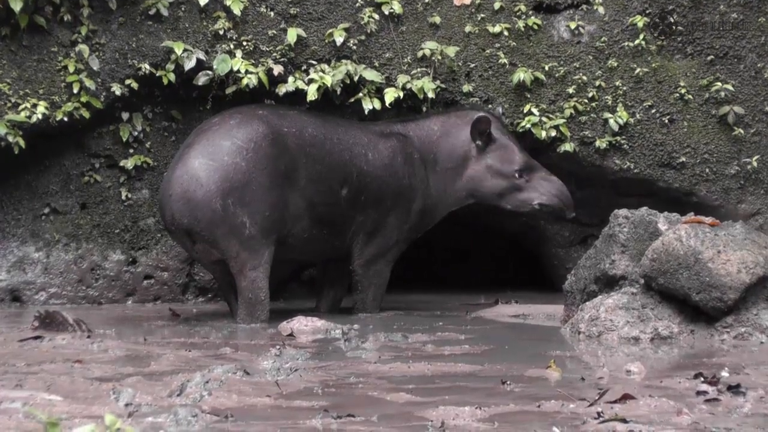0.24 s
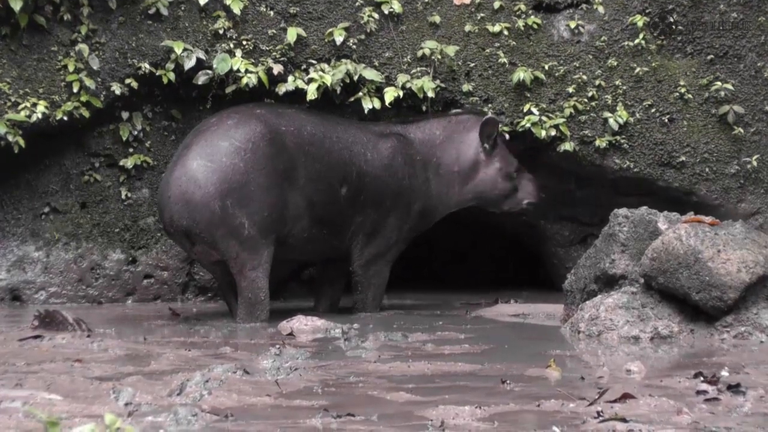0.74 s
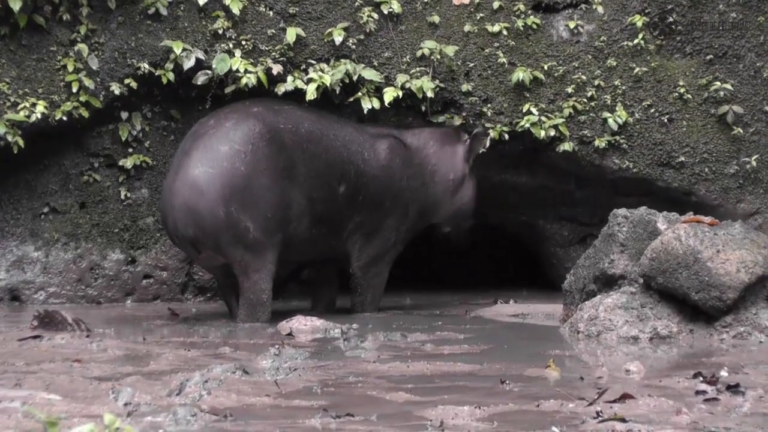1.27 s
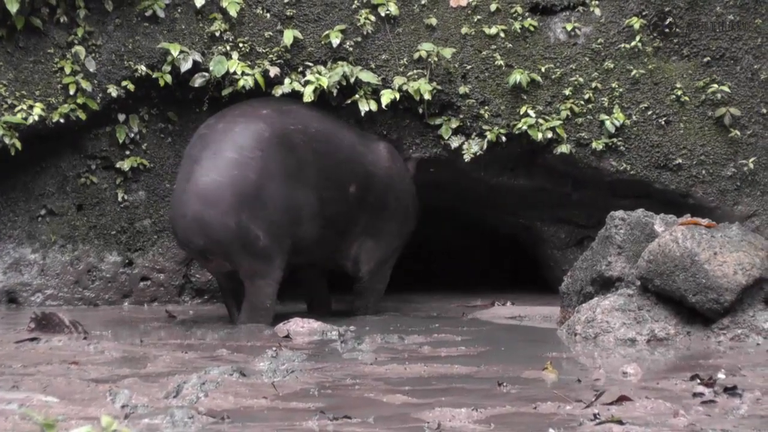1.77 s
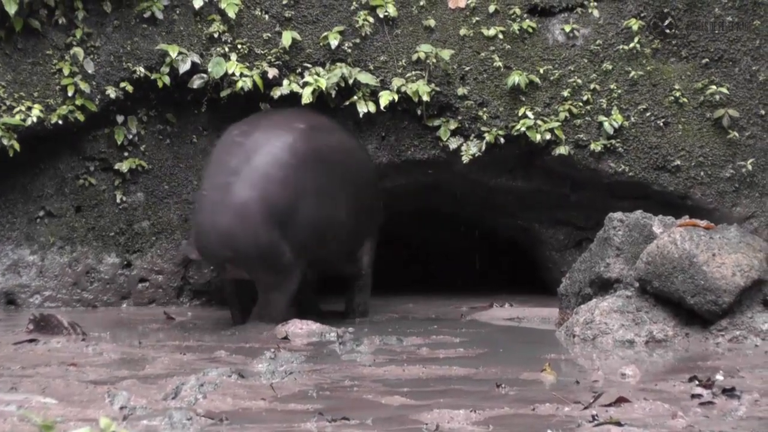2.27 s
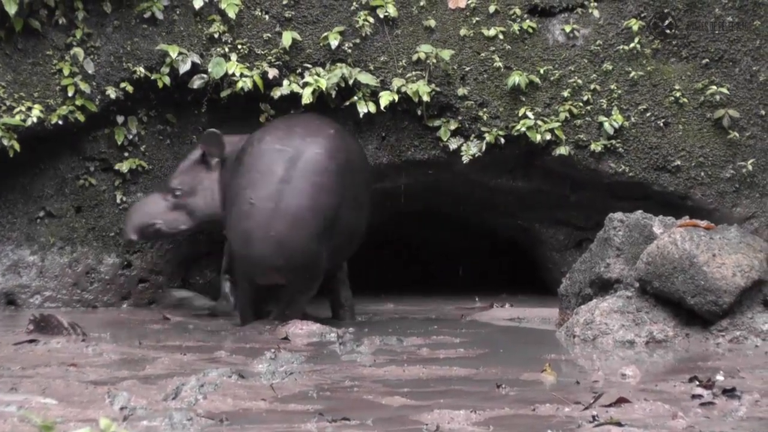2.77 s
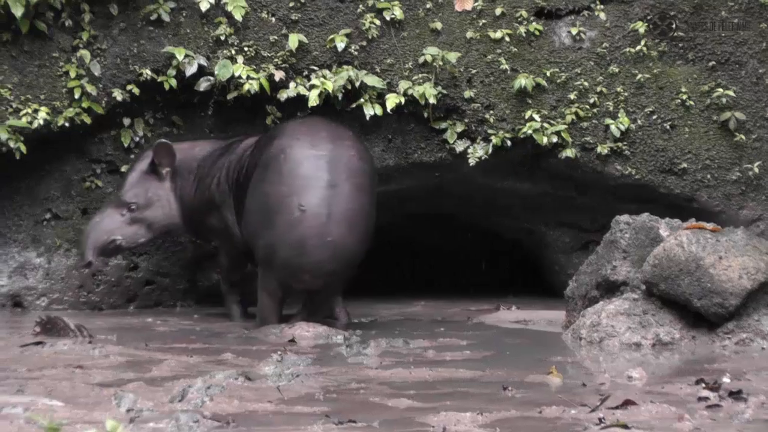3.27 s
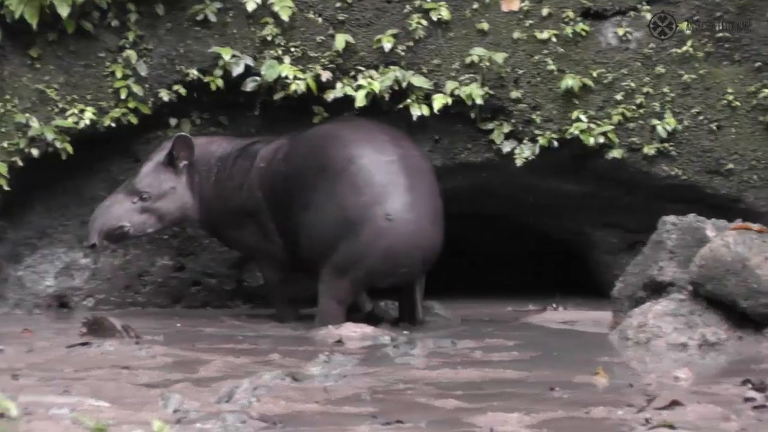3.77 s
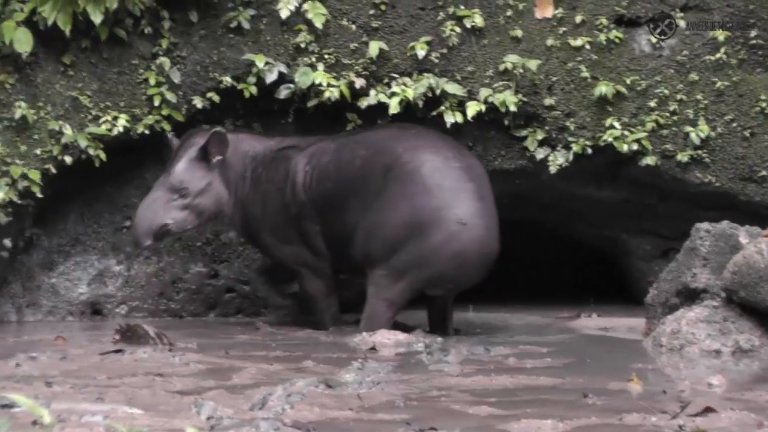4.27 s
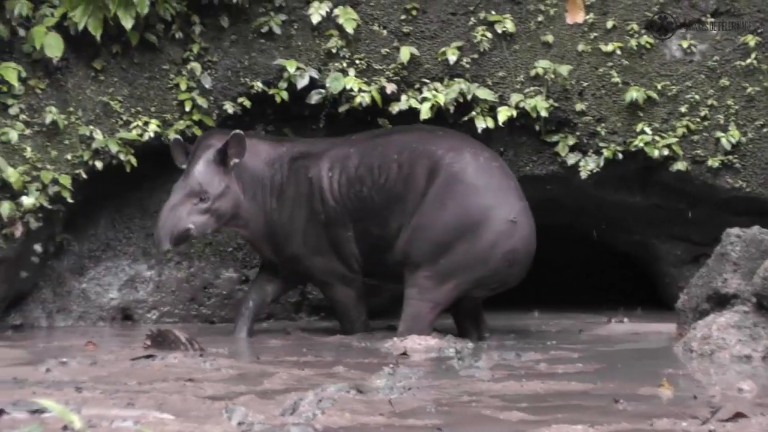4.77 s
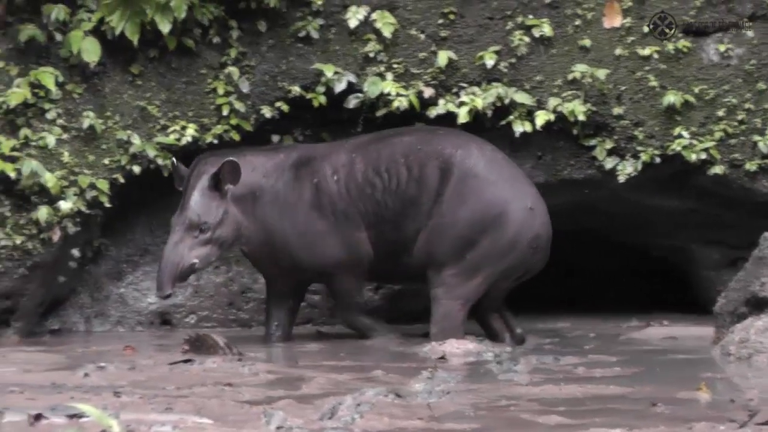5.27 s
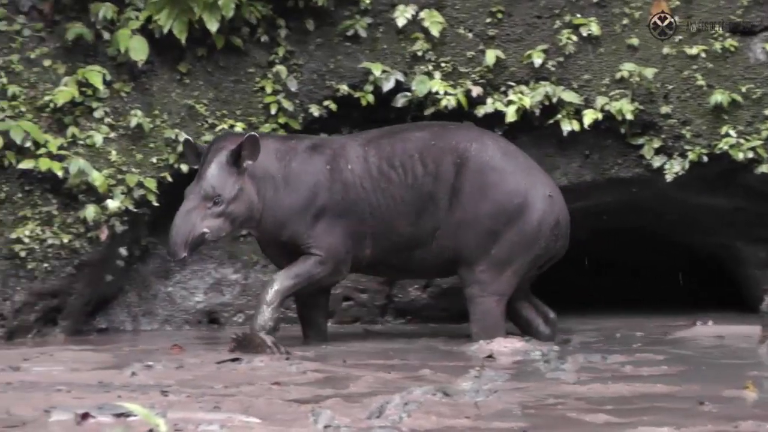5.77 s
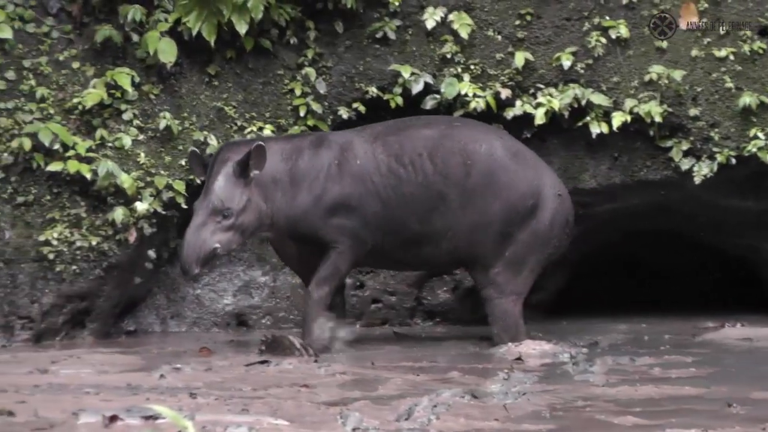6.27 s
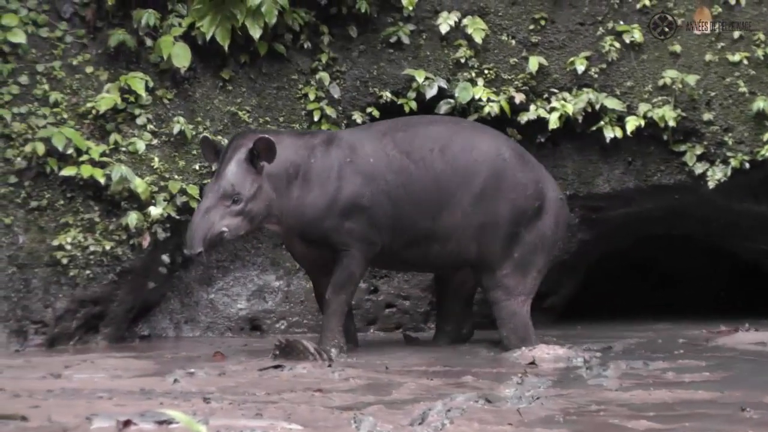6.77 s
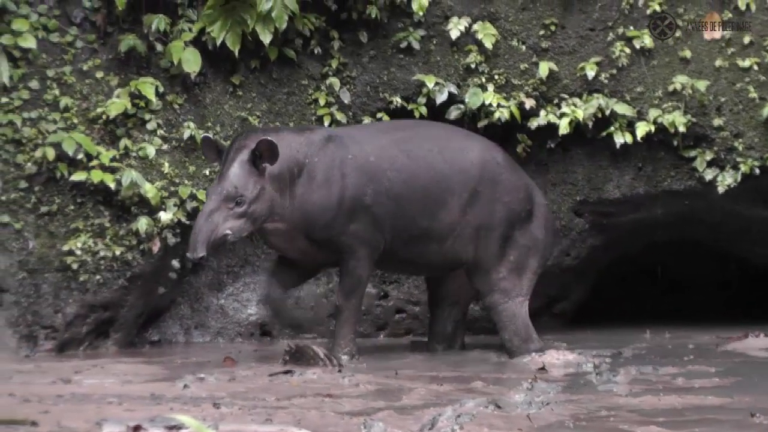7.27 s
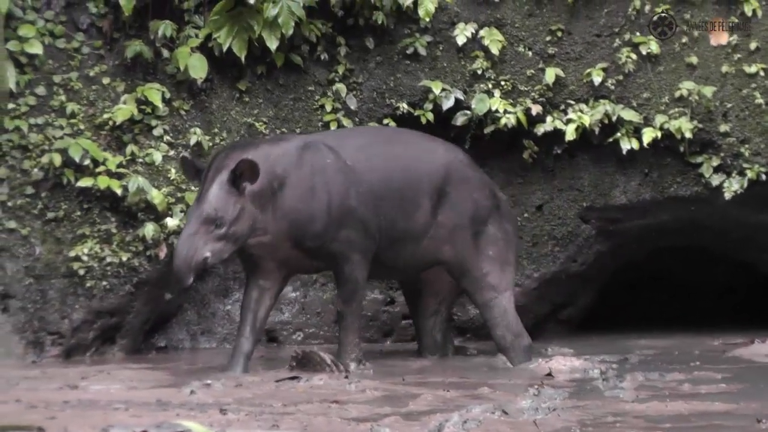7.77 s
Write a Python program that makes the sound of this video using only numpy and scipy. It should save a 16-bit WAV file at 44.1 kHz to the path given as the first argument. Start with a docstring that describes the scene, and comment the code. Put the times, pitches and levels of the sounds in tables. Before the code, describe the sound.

A small frog's rising whistle repeats quickly over a muddy forest pool, a second answering farther off, amid insect hiss and faint wet mud smacks.

```python
"""Two small frogs, one near and one further off, repeat a rising whistle over a muddy pool under a forest bank.
Each whistle is a gliding sine, thrown back by single reflectors and by leaves and trunks. A cicada's ringing
clicks sound overhead, far ones wind up as two hissing bands, a cricket trills in two beating tones.
A large animal wades slowly: noise-and-ring smacks of mud, clusters of gliding bubbles. Air hisses and hums.
A camera with close-set microphones listens; its clock ripples the gain."""
import sys
import numpy as np
from scipy import signal
from scipy.fft import rfft, irfft, next_fast_len
from scipy.io import wavfile
from scipy.ndimage import uniform_filter1d

SR = 44100
rng = np.random.default_rng(int(sys.argv[2]) if len(sys.argv) > 2 else 0)


def ratio(d):
    """dB to gain"""
    e = np.asarray(d, float) / 20
    return 10 ** e


def to_wav(sig):
    """Store sig (one row per channel, or 1-D mono) as 16-bit WAV at the path in sys.argv[1].

    Samples outside -1..1 are clipped; the rate is SR.
    """
    pcm = np.clip(np.atleast_2d(sig), -1, 1) * 32767
    pcm = np.round(pcm).astype(np.int16)
    wavfile.write(sys.argv[1], SR, pcm.T)  # frames by channels


N = 354563
T = np.arange(N) / SR
SIZE = next_fast_len(2 * N)
HZ = np.arange(SIZE // 2 + 1) * SR / SIZE

# Whistles. Each row: time of the reference pitch in seconds, source level in dB, first pitch in Hz,
# steepness of the rise as a factor.
NEAR_CALLS = [(-0.018, -33, 2996, 1.13), (0.2617, -34, 2986, 0.97), (0.5354, -34, 2983, 1.02),
              (0.812, -34.5, 2980, 0.97), (1.105, -33.5, 2970, 1.08), (1.397, -34, 2960, 1.05),
              (1.6879, -34, 2994, 0.97), (1.9775, -34, 2984, 0.99), (2.2752, -34.5, 2986, 0.97),
              (2.5592, -33.5, 2977, 1.04), (2.8446, -34, 2950, 1), (3.1258, -33.5, 2967, 1.07),
              (3.4256, -34.5, 2984, 0.92), (3.7096, -35.5, 2950, 0.92), (4.022, -35.5, 2935, .91),
              (4.3166, -35, 2970, 0.9), (4.6311, -35, 2940, 1.18), (4.9642, -34.5, 2935, 1.03),
              (5.3386, -34.5, 2940, 1.1), (5.716, -32.5, 2950, 1.07), (6.0959, -34, 2930, 1.14)]
FAR_CALLS = [(0.03, -50, 3250, .97), (0.3269, -48, 3310, 0.98), (0.6312, -43, 3260, 1),
             (0.9137, -42, 3310, 0.98), (1.2174, -44.5, 3260, 0.88), (1.5221, -41.5, 3200, 1),
             (1.8112, -43, 3220, .93), (2.1344, -40.5, 3260, .97), (2.3883, -41, 3220, 0.94),
             (2.7458, -41.5, 3260, 0.96), (3.082, -40, 3260, 1), (3.382, -40, 3270, 1),
             (3.6757, -42.5, 3150, 0.94), (3.9765, -42, 3210, 1), (4.272, -40.5, 3240, 0.96),
             (4.5674, -39.5, 3260, 0.99), (4.8553, -40.5, 3284, .97), (5.1593, -40, 3303, 0.98),
             (5.4444, -40.5, 3284, .97), (6.0015, -41.5, 3210, 0.92), (6.2983, -40.5, 3260, 0.99),
             (6.5637, -40.5, 3277, 0.92), (6.8388, -40, 3283, 0.98), (7.1197, -42.5, 3060, 0.95),
             (7.3933, -41, 3230, 0.95), (7.6639, -41, 3240, 0.99), (7.9496, -40.5, 3283, 0.98)]
# Pitch rise of a whistle. Each row: time from the reference pitch in seconds, pitch in Hz.
NEAR_RISE = [(-.055, 2900), (-.02, 3049), (0, 3200), (0.019, 3380), (0.038, 3610), (.055, 3720)]
FAR_RISE = [(-.045, 3040), (-.014, 3270), (0, 3330), (.012, 3390), (.025, 3560), (.045, 4000)]
# Pitch span from first pitch to break-off. Entries: span at 0 s in Hz, drift in Hz per second.
NEAR_REACH_HZ = (718, -17.5)
FAR_REACH_HZ = (590, 6)
# Gain of the direct path. Each row: frequency in Hz, gain in dB.
NEAR_COLOUR = [(2900, -8), (3020, -1.5), (3080, -5.5), (3200, 7.5), (3300, -8.5), (3420, -8), (3560, 4.5),
               (3700, -12.5), (3800, -6)]
FAR_COLOUR = [(3050, 2), (3250, 3.5), (3330, 4.5), (3390, 4), (3480, -0.5), (3560, -2), (3750, -2),
              (3900, -30)]
# Reflectors, each returning a slice of the whistle. Each row: delay in seconds, centre in Hz,
# width in Hz, gain in dB.
NEAR_ECHOES = [(.012, 3204, 170, -1.5), (.006, 3600, 110, -8.5), (0.032, 3200, 25, -3),
               (0.04, 3234, 96, -2), (0.0289, 1700, 70, -19), (0.0315, 2720, 190, -9.5),
               (0.01285, 4000, 110, -19)]
FAR_ECHOES = [(.030, 3420, 70, -9), (.016, 3630, 60, 4), (.030, 3610, 60, 2.5), (.056, 3445, 70, -28),
              (.062, 3730, 90, -0.5), (.1, 3449, 70, -10.5)]
# Cicada loudness. Each row: time in seconds, level in dB before flicker.
CICADA_LEVEL = [(0, -50), (7.1, -50), (7.6, -50.5)]
# Tymbal resonances. Each row: centre in Hz, width in Hz, relative gain in dB.
TYMBAL_MODES = [(8440, 1780, 4), (9060, 760, -0.5), (13000, 1500, -11), (5300, 490, -11)]
# Far cicadas. Each row: time in seconds, low band in dB, high band in dB, both before flicker.
CHOIR_LEVELS = [(0, -66, -59), (.5, -62, -61), (1.1, -60, -60), (2.4, -58.5, -58), (2.8, -61, -51.5),
                (4, -65, -52), (6, -64, -52.5), (8.04, -60.5, -54)]
# Cricket trills. Each row: start in seconds, level in dB before flicker.
TRILLS = [(-.03, -56), (.35, -63), (.72, -70), (1.07, -59), (1.46, -60), (1.84, -60), (2.19, -59),
          (3.57, -56.5), (3.94, -56), (4.42, -65), (4.83, -62), (5.2, -57), (5.9, -56.5), (6.28, -61),
          (6.68, -61), (6.98, -62)]
# Air, leaves and far insects. Each row: frequency in Hz, relative density in dB per Hz.
AIR_SPECTRUM = [(20, -25.5), (40, -23.5), (187, -19.5), (263, -15.5), (674, -8.5), (1370, -12), (2020, -16),
                (2900, -11), (4100, -16.5), (5760, -25), (7100, -11), (9300, -19.5), (10300, -22),
                (13300, -29), (13800, -41), (15600, -24)]
# Width of the air. Each row: frequency in Hz, side over mid in dB.
AIR_SIDE = [(60, -16), (110, -16), (200, -14), (380, -17.5), (700, -20), (1290, -22), (2380, -27),
            (4400, -60), (8120, -28.5), (15000, -10)]
# Faint steady tones. Each row: frequency in Hz, rms level in dB before drift.
HUMS = [(283, -75.5)]
# Mud letting go. Each row: time in seconds, source level in dB, ring in Hz.
SMACKS = [(.237, -36, 1080), (0.642, -32, 1790), (.655, -40, 1510), (1.061, -39, 1090), (5.838, -25, 2350),
          (5.861, -28, 2780), (5.885, -32, 1100), (5.920, -28.5, 2100), (7.589, -30.5, 2540)]
# Water stirred by a leg. Each row: start in seconds, span of bubble onsets in seconds, source level in dB,
# centre pitch in Hz, a third of the pitch span in octaves.
SLOSHES = [(.642, 0.04, -51, 1200, 0.71), (1.651, 0.091, -58, 700, 0.24), (2.846, .2, -54, 703, 0.27),
           (3.23, 0.0514, -63.5, 154, 0.12), (3.7, 0.24, -52, 750, 0.38), (4.15, .04, -56.5, 1450, .1),
           (5.837, .006, -45, 2300, .5), (5.858, 0.04, -34, 4200, 0.54), (5.852, 0.022, -47.5, 732, 0.15),
           (5.875, 0.026, -46, 1110, 0.076), (5.927, 0.0039, -50, 1990, 0.53),
           (5.982, 0.021, -52.5, 910, 0.49), (6.098, .15, -52, 800, 0.28), (6.385, .05, -47.5, 2150, 0.07),
           (6.433, 0.059, -54, 1936, .1), (7.579, 0.17, -52, 740, 0.11)]
# Gain ripple of the camera clock. Each row: harmonic number, depth in dB.
CLOCK_RIPPLE = [(1, -19), (2, -24), (3, -28), (4, -34)]

SWELL_S, EDGE_S = 0.017, 0.014  # whistle swell-in and edge smoothing
CICADA_CLICKS_PER_S, CICADA_SPEEDUP_PER_S2 = 106.43, 0.212
TRILL_S, TRILL_EDGE_S = 0.26, 0.025
AIR_DB = -50  # mid rms
CLOCK_HZ = 3903


def curve(table, column=1, at=T):
    """A table column joined by straight lines."""
    rows = np.array(table, float)
    return np.interp(at, rows[:, 0], rows[:, column])


def octave_gain(table, octave):
    """Gain from (Hz, dB) rows joined by straight lines over octaves."""
    hz, db = np.array(table, float).T
    return ratio(np.interp(octave, np.log2(hz), db))


def shape(x, response):
    """Pass a sound through a frequency response."""
    return irfft(rfft(x, SIZE) * response, SIZE)[..., :N]


def hump(hz, width_hz):
    """A Gaussian band, gain 1 at the centre."""
    return np.exp(-0.5 * ((HZ - hz) / width_hz) ** 2)


def unit(x):
    """Scale to rms 1."""
    return x / np.sqrt(np.mean(x ** 2))


def walk(rate_hz):
    """Random levels held 1 / rate_hz and slewed twice; spread near 1."""
    hold = int(SR / rate_hz)
    steps = np.repeat(rng.standard_normal(N // hold + 1), hold)
    return 1.4 * uniform_filter1d(uniform_filter1d(steps, hold), hold)[:N]


def forest(t60_s, onset_s, side_db):
    """Dense scatter from trunks and leaves: mid response of about unit energy, side at side_db."""
    fade = np.exp(-np.log(1000) * T / t60_s) * (1 - np.exp(-T / onset_s))
    tails = rng.standard_normal((2, N)) * fade / np.sqrt(np.sum(fade ** 2))
    return rfft(tails, SIZE) * np.array([[1], [ratio(side_db)]])


def frog(calls, rise, reach_hz, colour, echoes, near_db, far_db, side_db, pan):
    """Rising sine whistles, heard directly, off single reflectors and through the forest."""
    lead = SR // 10  # room for a whistle that began earlier
    voice = np.zeros(N + 2 * lead)
    span_s = np.arange(-lead // 2, lead) / SR
    centre_hz = curve(rise, at=0)
    for s, db, first_hz, steep in calls:
        hz = centre_hz + steep * (curve(rise, at=span_s) - centre_hz)
        tone = np.sin(2 * np.pi * np.cumsum(hz) / SR)
        last_hz = first_hz + reach_hz[0] + reach_hz[1] * s
        in_pitch = (hz > first_hz) & (hz < last_hz)
        sounding = in_pitch & (span_s > rise[0][0]) & (span_s < rise[-1][0])
        swell = np.minimum(np.cumsum(sounding) / (SWELL_S * SR), 1)
        envelope = uniform_filter1d(swell * sounding, int(EDGE_S * SR))
        at = int(s * SR) + lead // 2
        voice[at:at + len(span_s)] += ratio(db) * envelope * tone
    direct = ratio(curve(colour, at=HZ))
    paths = direct + sum(ratio(db) * hump(hz, width_hz) * np.exp(-2j * np.pi * HZ * delay_s)
                         for delay_s, hz, width_hz, db in echoes)
    undergrowth = ratio(near_db) * forest(0.43, 0.0021, side_db)  # at once and brief
    trunks = ratio(far_db) * forest(1.8, 0.03, side_db)  # late and long
    response = np.array([paths, pan * paths]) + (undergrowth + trunks) * direct ** 0.12
    return irfft(rfft(voice, SIZE) * response, SIZE)[:, lead:lead + N]


def cicada():
    """Tymbal clicks, a strong and a weak membrane in turn, ring briefly and scatter overhead."""
    phase = 0.25 + np.cumsum(CICADA_CLICKS_PER_S + CICADA_SPEEDUP_PER_S2 * T) / SR
    at = np.flatnonzero(np.diff(np.floor(phase)))
    chance = rng.standard_normal((len(at), 3))
    size = ratio(1.45 * chance[:, 0] + 1.5 * (-1.0) ** np.arange(len(at)))
    clicks, stirred = np.zeros((2, N))
    # jitter in samples: uneven strokes; moving leaves blur the scattered part more
    clicks[at + np.rint(0.4 * chance[:, 1]).astype(int)] = size
    stirred[at + np.rint(0.75 * chance[:, 2]).astype(int)] = size
    ring = sum(ratio(db) / (1 + 2j * (HZ - hz) / width_hz) ** 2 for hz, width_hz, db in TYMBAL_MODES)
    scatter = ratio(0.5) * forest(0.4, 0.006, -15.5)
    direct = shape(clicks, ring * np.array([[1], [0.3j]]))
    heard = direct + shape(stirred, ring * scatter)
    return heard / np.std(heard[0]) * ratio(curve(CICADA_LEVEL) + 0.8 * walk(7))


def choir():
    """Far cicadas blur into two hissing bands."""
    bands = 0
    for column, (hz, width_hz) in enumerate([(5000, 390), (6500, 1060)], 1):
        hiss = unit(shape(rng.standard_normal((2, N)), hump(hz, width_hz)))
        bands = bands + hiss * ratio(curve(CHOIR_LEVELS, column) + 1.15 * walk(8.1))
    return bands * np.array([[1], [ratio(-18.5)]])


def cricket():
    """Trills of two thin neighbouring tones that beat, with a brief smear of distance."""
    tone = sum(np.sin(2 * np.pi * np.cumsum(hz + 16 * walk(20)) / SR) for hz in (6616, 6667))
    trills = 0
    for s, db in TRILLS:
        to_edge_s = np.minimum(T - s, s + TRILL_S - T)
        trills = trills + ratio(db) * np.clip(to_edge_s / TRILL_EDGE_S, 0, 1)
    smear = 0.2 * forest(0.12, 0.003, -8)
    return shape(tone * trills * ratio(2.0 * walk(15)), np.array([[1], [0.1]]) + smear)


def air():
    """Octave bands of smooth hiss, each drifting a little, with a faint hum."""
    octave = np.log2(HZ + 1)
    width = np.array([np.ones(len(HZ)), octave_gain(AIR_SIDE, octave)])
    noise = rfft(rng.standard_normal((2, N)), SIZE) * octave_gain(AIR_SPECTRUM, octave) * width
    hiss = 0
    for centre in range(4, 15):  # 16 Hz to 16 kHz
        band = np.cos(np.pi / 2 * np.clip(octave - centre, -1, 1)) ** 2
        hiss = hiss + irfft(noise * band, SIZE)[:, :N] * ratio(0.9 * walk(5))
    hums = sum(ratio(db + 1.4 * walk(1.17)) * np.sqrt(2) * np.sin(2 * np.pi * hz * T) for hz, db in HUMS)
    return hiss / np.std(hiss[0]) * ratio(AIR_DB) + hums * np.array([[1], [0]])


def wading():
    """Smacks of mud, and bursts of bubbles whose pitch glides up as they close."""
    water, short_s = np.zeros(N + SR), np.arange(SR // 20) / SR
    for s, db, hz in SMACKS:
        crack = rng.standard_normal(len(short_s)) * np.exp(-short_s / 0.003)
        ring = np.sin(2 * np.pi * hz * short_s) * np.exp(-short_s * hz / 3)
        water[int(s * SR):][:len(short_s)] += ratio(db) * (0.7 * crack + 0.7 * ring)
    for s, length_s, db, centre_hz, spread in SLOSHES:
        for when, pitch, size in rng.random((40, 3)):
            hz = np.clip(centre_hz * 2 ** (spread * 3 * (pitch - 0.5)), 60, 12000)
            glide = np.sin(2 * np.pi * hz * short_s * (1 + 4.0 * short_s))
            bubble = glide * np.exp(-short_s * hz / 4.5)
            at = int((s + when * length_s) * SR)
            water[at:][:len(short_s)] += ratio(db - 11.0 * size + 6) * bubble
    # second-order high-pass at 250 Hz and low-pass at 6 kHz
    colour = (1j * HZ / (250 + 1j * HZ) / (1 + 1j * HZ / 6000)) ** 2
    bank = ratio(-11) * forest(0.2, 0.005, -14)
    return shape(water[:N], colour * (np.array([[1], [0.05]]) + bank))


def scene():
    """All sources as mid and side, turned into left and right."""
    near = frog(NEAR_CALLS, NEAR_RISE, NEAR_REACH_HZ, NEAR_COLOUR, NEAR_ECHOES,
                near_db=-2.5, far_db=-4.5, side_db=-25, pan=0.088)
    far = frog(FAR_CALLS, FAR_RISE, FAR_REACH_HZ, FAR_COLOUR, FAR_ECHOES,
               near_db=2.0, far_db=0.5, side_db=-24, pan=-0.05)
    mid, side = near + far + cicada() + choir() + cricket() + air() + wading()
    return np.array([mid + side, mid - side])


def band_limit(x):
    """A steep low-pass at the top of the band."""
    return signal.sosfilt(signal.butter(12, 15700, fs=SR, output="sos"), x)


def record(dry):
    """A clock in the camera ripples the gain, so each whistle has faint ghosts above and below."""
    ripple = sum(ratio(db) * np.cos(2 * np.pi * k * CLOCK_HZ * T) for k, db in CLOCK_RIPPLE)
    return band_limit(dry * (1 + ripple))


dry = scene()
out = record(dry)
to_wav(out)
```